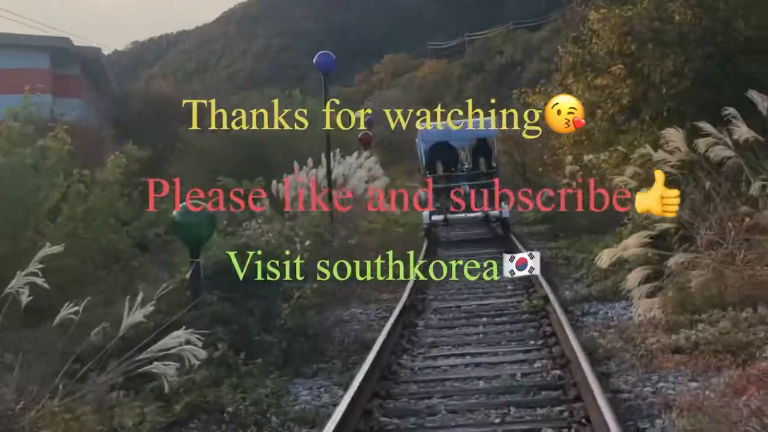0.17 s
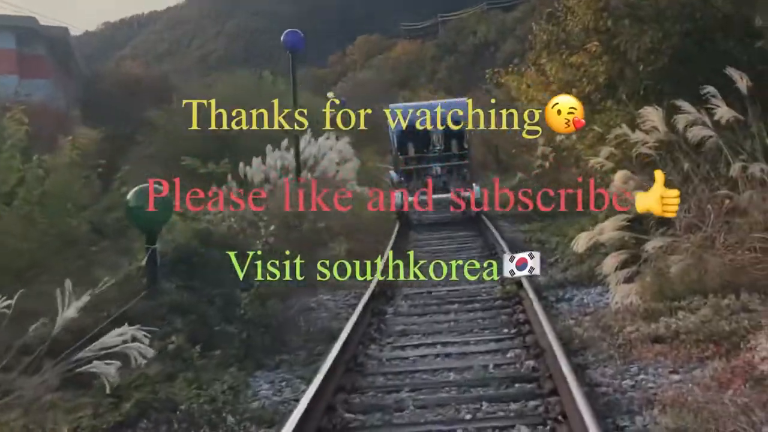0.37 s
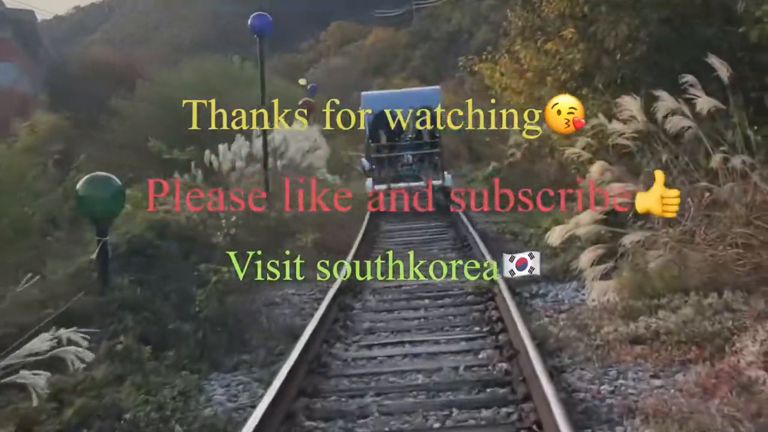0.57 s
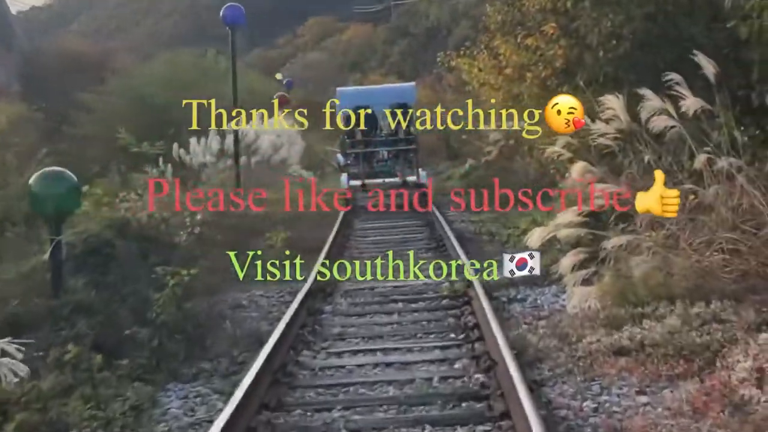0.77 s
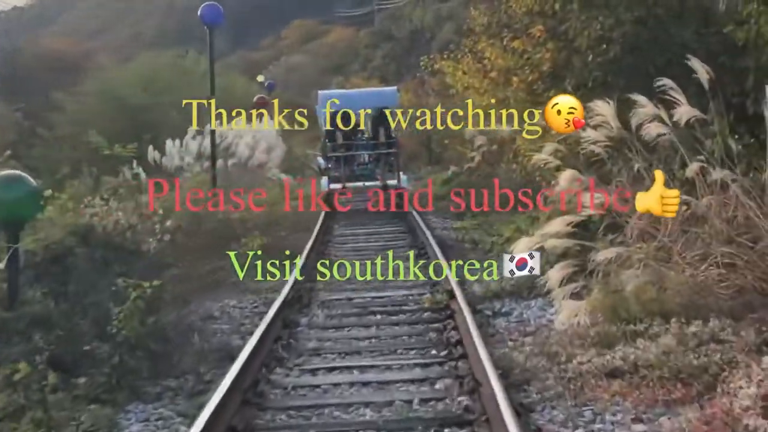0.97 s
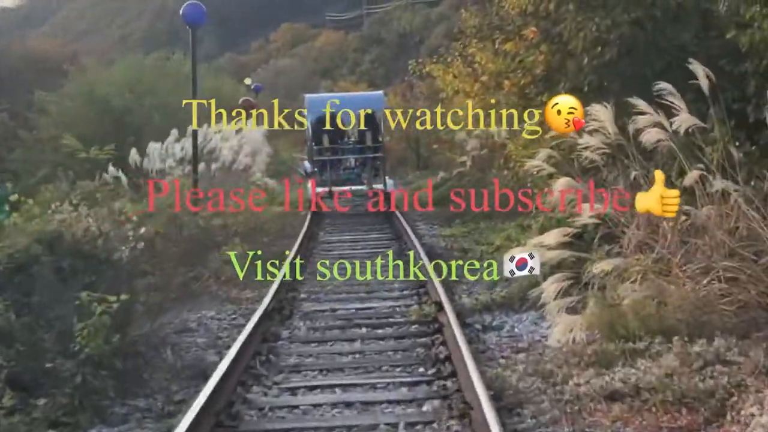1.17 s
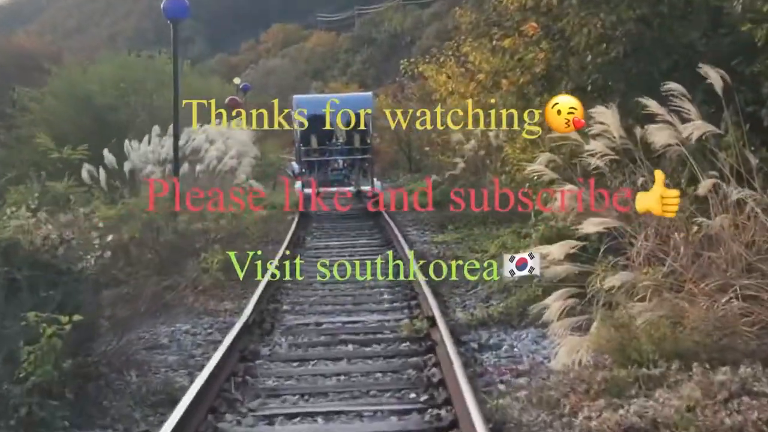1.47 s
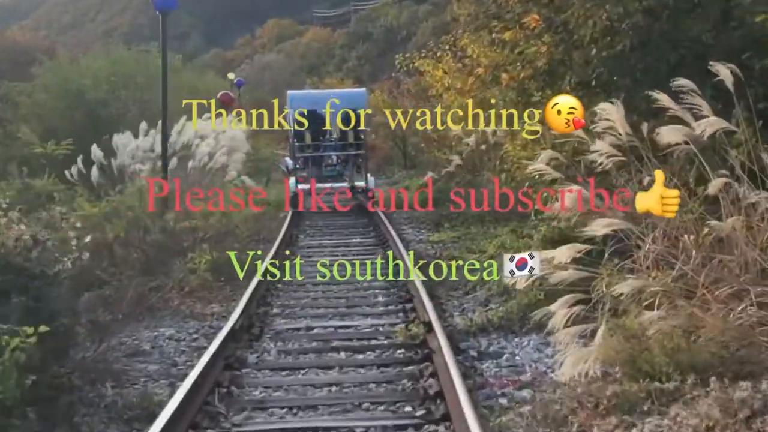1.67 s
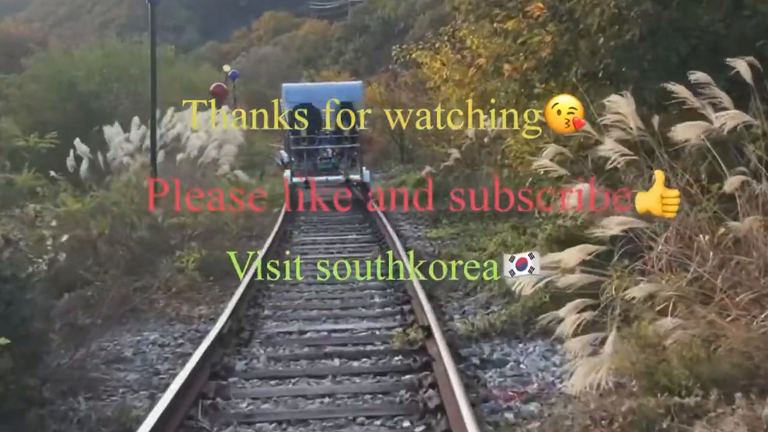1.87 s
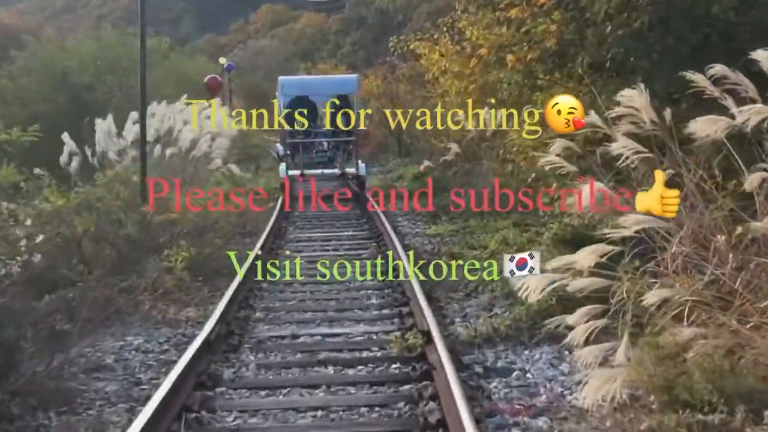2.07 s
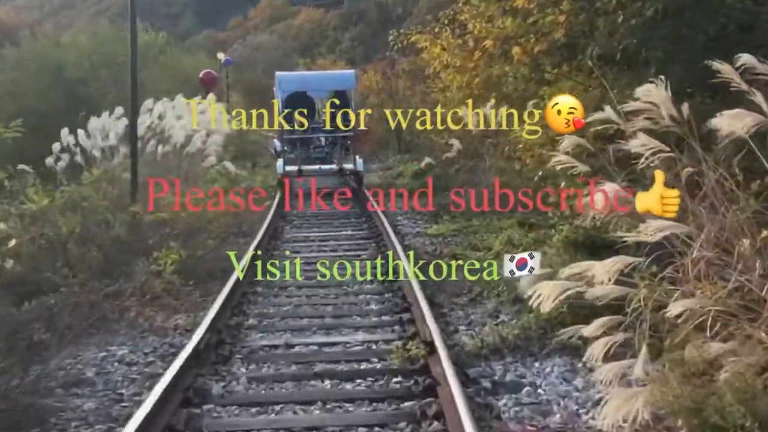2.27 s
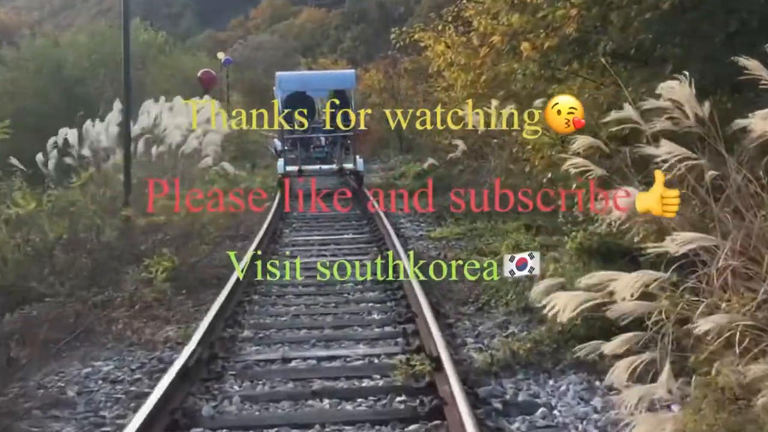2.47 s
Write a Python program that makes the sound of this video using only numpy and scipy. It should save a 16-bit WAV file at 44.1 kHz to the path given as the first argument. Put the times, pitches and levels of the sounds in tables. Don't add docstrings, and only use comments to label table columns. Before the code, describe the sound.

Low lumpy rolling rumble of a small rail cart, with sharp clacks, faint ticks and a brief squeak

```python
import sys
import numpy as np
from scipy import signal
from scipy.fft import rfft, irfft, next_fast_len
from scipy.io import wavfile
from scipy.ndimage import uniform_filter1d, map_coordinates

SR = 44100
rng = np.random.default_rng(int(sys.argv[2]) if len(sys.argv) > 2 else 0)


def int16_out(signal):
    q = np.round(np.clip(np.atleast_2d(signal).T, -1, 1) * 32767)
    wavfile.write(sys.argv[1], SR, q.astype(np.int16))


def magnitude_from_level(level_db):
    exponent = np.asarray(level_db, float) / 20
    return 10 ** exponent


N = 115983
T = np.arange(N) / SR

# f/Hz, density/dB per Hz
LOOSE_METAL = [(600, -16), (2000, 8), (5000, 1), (9000, 1), (15000, -2)]


def unit(x):
    return x / np.sqrt(np.mean(x ** 2) + 1e-20)


def along(points, hz):
    f, v = np.transpose(points)
    return np.interp(np.log(hz + 1), np.log(f + 1), v)


def wobble(rate):
    return map_coordinates(rng.standard_normal(9000), [T * rate])


def evened(x, seconds):
    power = np.abs(uniform_filter1d(x ** 2, int(seconds * SR)))
    return unit(x / np.sqrt(power + 1e-9))


def filtered(x, response):
    m = next_fast_len(N + SR // 2)
    return irfft(rfft(x, m) * response(np.fft.rfftfreq(m, 1 / SR)), m)[:N]


def resonances(modes):
    def response(f):
        total = 0
        for k, (centre, width, db) in enumerate(modes):
            damping = 1j * f * width
            total = total + (-1) ** k * magnitude_from_level(db) * damping / (centre * centre - f * f + damping)
        return total
    return response


def coloured(points):
    return unit(filtered(rng.standard_normal(N), lambda f: magnitude_from_level(along(points, f))))


def wandering(hz, wander_hz, rate):
    return np.sqrt(2) * np.sin(2 * np.pi * np.cumsum(hz + wander_hz * wobble(rate)) / SR)


def strikes(times, levels_db, t60s):
    out, t = np.zeros(N), T[:6000]
    for s, db, t60 in zip(times, levels_db, t60s):
        i = int(s * SR)
        rise = 1 - magnitude_from_level(-60 * t / (0.23 * t60))
        out[i:i + 6000] += (magnitude_from_level(db - 60 * t / t60) * rise)[:max(N - i, 0)]
    return out


def swell(s, length, rise):
    u = np.clip((T - s) / length, 0, 3)
    return (1 - np.exp(-u / rise)) * np.exp(-1.6 * u ** 1.7) * (u < 3)


def bursts(rows, rise):
    out = np.zeros(N)
    for s, n, db, hz in rows:
        u = T - s
        tone = np.sin(2 * np.pi * hz * u * (1 + rise * u / n / 2))
        out += magnitude_from_level(db + 3.5) * np.exp(-(u / n) ** 2) * tone
    return out


def frame_rumble():
    # f/Hz, width/Hz, level/dB
    frame_modes = [(112, 34, -6.5), (250, 83, -7), (166, 59, -13), (329.5, 53, -13.5), (429, 69.6, -6),
                   (511, 46.7, -2.5), (587.4, 36.2, -7), (765, 225, -19.5)]

    def transfer(f):
        band = 1 / np.sqrt((1 + (f / 680) ** 8) * (1 + (88 / (f + 1)) ** 10)) + 0.12
        return resonances(frame_modes)(f) * band

    roughness = rng.standard_normal(N) * magnitude_from_level(0.52 * wobble(24.27))
    return evened(unit(filtered(roughness, transfer)), 0.099)


def floor_panel():
    panel_hz, width_hz = 246, 61
    skin = resonances([(panel_hz, width_hz, 0)])
    shaken = unit(filtered(rng.standard_normal(N), lambda f: skin(f) ** 2))
    return unit(shaken + wandering(panel_hz, 7.54, 13))


def axle(base_db):
    # t/s, length/s, level/dB
    heaves = [(0.213, 0.041, -21), (0.429, 0.041, -30), (0.534, 0.051, -25), (0.654, 0.041, -25),
              (0.728, 0.06, -24), (0.84, 0.028, -31.5), (0.946, 0.029, -26), (1.199, 0.045, -26),
              (1.245, 0.089, -23.5), (1.442, 0.037, -27.5), (1.61, 0.026, -31), (1.7, 0.079, -31),
              (1.77, 0.085, -23.5), (2.123, 0.036, -35), (2.199, 0.022, -31), (2.25, 0.08, -29),
              (2.37, 0.045, -27), (2.5, 0.041, -27), (2.594, 0.029, -33)]
    swells = np.zeros(N)
    for s, n, db in heaves:
        swells += magnitude_from_level(db - 6) * np.exp(-((T - s - n / 2) / (0.56 * n)) ** 4)
    return (magnitude_from_level(base_db - 2 * wobble(6.4)) + swells) * wandering(108.4, 2.93, 12)


def wheel_rims():
    # f/Hz, width/Hz, level/dB
    rim_modes = [(1889, 80, 3), (2008, 47, 2), (2130, 127, 0.5), (2400, 44, -6), (2389, 82, 1),
                 (2596, 9.2, 3), (3230, 95, -16.5), (3507, 64, -6.5), (3768, 75, -6), (4490, 350, -14),
                 (5420, 650, -13.5)]
    rims = np.zeros(N)
    for mode in rim_modes:
        roughness = rng.standard_normal(N) * magnitude_from_level(3 * wobble(45.05))
        rims += filtered(roughness, resonances([mode]))
    return evened(unit(rims), 0.3)


def tread_hiss():
    # f/Hz, density/dB per Hz
    hiss_spectrum = [(18, -115), (30, -25), (103, 33), (231, -22), (333, -13), (506, -0.5), (693, -17),
                     (2030, -29.5), (15600, -47)]
    return unit(filtered(coloured(hiss_spectrum), lambda f: 1 / np.sqrt(1 + (664 / (f + 1)) ** 6)))


def track_bed():
    bed = resonances([(50.5, 70, 0)])
    return unit(filtered(rng.standard_normal(N), lambda f: bed(f) ** 2))


def rolling():
    # t/s, wheel load/dB, floor panel level/dB, axle level/dB
    drive_rows = [(0, -30, -23, -39), (.05, -29.5, -28.5, -35), (.23, -27, -21, -30), (.36, -27, -39, -31),
                  (.5, -27, -22, -24.5), (.7, -27, -26, -30.5), (1.05, -26.5, -24.5, -31.5),
                  (1.29, -25.5, -31, -31), (1.35, -27, -26, -28), (1.48, -26, -33, -28),
                  (1.59, -26.5, -34, -30), (1.66, -25.5, -25, -22), (1.78, -25.5, -28, -22.5),
                  (1.97, -25, -27.5, -34), (2.28, -26, -63, -22), (2.45, -25.5, -23, -28),
                  (2.56, -26, -26, -31), (2.63, -29.5, -35, -23)]
    s, *drives = np.transpose(drive_rows)
    load_db, panel_db, axle_db = (np.interp(T, s, d) for d in drives)
    body = magnitude_from_level(load_db + 1.92) * frame_rumble() + magnitude_from_level(panel_db - 6.5) * floor_panel() + axle(axle_db - 6.5)
    shake = magnitude_from_level(0.67 * (load_db - load_db.mean()) + 0.37 * wobble(9.08))
    wheels = shake * (magnitude_from_level(-42) * wheel_rims() + magnitude_from_level(-38.5) * tread_hiss())
    return body + wheels + magnitude_from_level(-52) * track_bed()


def rattles():
    per_s, floor_db, spread_db, t60 = 60, -52, 2.5, 0.029
    gaps, sizes, lengths = rng.exponential(size=(300, 3)).T
    times = np.cumsum(gaps) / per_s
    levels_db = floor_db + spread_db * np.minimum(sizes, 2.5)
    return strikes(times, levels_db, t60 * (.5 + lengths)) * coloured(LOOSE_METAL)


def clacks():
    # t/s, peak level/dB, knock peak level/dB, t60/s
    clack_rows = [(.0135, -35, -53, 0.046), (.034, -35, -36, 0.026), (0.0397, -23.5, -28.5, 0.017),
                  (0.048, -41, -37, .03), (0.194, -30, -48, 0.011), (0.246, -38, -37, 0.028),
                  (.733, -43, -44, 0.056), (0.793, -37, -39, 0.043), (0.956, -37, -44, .04),
                  (1.077, -36, -38, .035), (1.084, -48, -40, .035), (1.093, -46, -32.5, .035),
                  (1.241, -47, -60, 0.044), (1.305, -42, -36.5, .035), (1.392, -44, -41, .035),
                  (1.654, -40, -36, .035), (1.723, -24, -28.5, 0.036), (1.737, -39, -41, .035),
                  (1.934, -56, -40, .035), (2.0235, -39, -81, 0.062), (2.259, -32.5, -63, 0.046),
                  (2.276, -35, -54, 0.038), (2.3908, -30, -44, 0.036), (2.481, -38, -42, .04),
                  (2.499, -40, -55, .03), (2.553, -46, -31, .03)]
    # t/s, peak level/dB
    small_ticks = [(0.1087, -46), (0.1394, -52), (0.3017, -44), (0.3446, -43), (0.415, -53), (0.4594, -39),
                   (0.555, -36.5), (0.7791, -38), (0.8629, -42), (1.4696, -40), (1.8766, -38),
                   (1.9904, -42), (2.073, -36), (2.147, -34), (2.3114, -39)]
    # f/Hz, width/Hz, level/dB
    knock_modes = [(1125, 110, 4), (1364, 160, 4.5), (1700, 190, 2.5), (2590, 490, 0), (3570, 180, 2.5),
                   (4450, 720, -2.5)]
    # f/Hz, level/dB, t60/s
    hollow_modes = [(1137, 4, 0.031), (1400, 1.5, 0.036)]
    s, db, knock_db, t60 = np.transpose(clack_rows)
    small_s, small_db = np.transpose(small_ticks)
    tick_envelope = strikes(s, db - 3.5, t60) + strikes(small_s, small_db - 2, 0 * small_s + 0.032)
    ticks = tick_envelope * coloured(LOOSE_METAL)

    def dying(level_db, decay_s):
        lag_s, rise_s = .0003, .0005
        slow = strikes(s + lag_s, level_db, 0 * s + decay_s)
        return slow - strikes(s + lag_s, level_db, 0 * s + 7 * rise_s)

    blows = rng.standard_normal(N)
    body = resonances(knock_modes)
    knocks = filtered(dying(knock_db + 2.5, .038) * blows, body) / np.std(filtered(blows, body))
    rings = sum(dying(knock_db - 0.5 + g, d) * wandering(hz, 39.0, 90) for hz, g, d in hollow_modes)
    return ticks + knocks + rings


def squeaks():
    # t/s, f/Hz
    squeak_starts = [(2.523, 4680), (2.52, 5050), (.248, 5150), (2.036, 11750), (2.053, 9450), (.92, 8950),
                     (1.295, 10750), (.048, 9350)]
    # length/s, level/dB, overtone level/dB
    squeak_sizes = [(.02, -33, -1), (.009, -33, -5), (.024, -42, -12), (.018, -44, -30), (.01, -50, -30),
                    (.018, -50, -30), (.014, -51, -30), (.012, -48, -30)]
    sag, jitter, flutter_db = .002, .024, 1.8
    out = np.zeros(N)
    for (s, hz), (n, db, over_db) in zip(squeak_starts, squeak_sizes):
        pitch = 1 - sag * np.clip((T - s) / n - .5, -1, 2) + jitter * wobble(1400)
        turn = 2 * np.pi * np.cumsum(hz * pitch) / SR
        over = magnitude_from_level(over_db) * (np.sin(2 * turn) + magnitude_from_level(-10) * np.sin(3 * turn)) * (hz < 6000)
        level = magnitude_from_level(db + 6.0 + flutter_db * wobble(400))
        out += level * swell(s, n, 0.072) * (np.sin(turn) + over)
    return out


def rim_squeals():
    # t/s, f/Hz
    squeal_rows = [(.262, 2450), (.302, 1950), (.52, 2420), (.555, 2380), (.762, 1970), (.812, 2000),
                   (.897, 2060), (1.098, 2480), (1.23, 2430), (1.28, 2020), (1.52, 1900), (1.95, 1900),
                   (2.015, 1920), (2.22, 2420), (2.25, 1960), (2.34, 2450), (2.4, 2420), (2.465, 2440),
                   (2.51, 1900)]
    half_length_s, level_db = 0.0056, -41
    sizes_db = 0.4 * rng.standard_normal(40)
    rows = [(s, half_length_s, level_db + d, hz) for (s, hz), d in zip(squeal_rows, sizes_db)]
    return bursts(rows, 0.018) * magnitude_from_level(2.6 * wobble(200))


def booms():
    # t/s, length/s, level/dB, f/Hz
    panel_surges = [(.393, .04, -23.5, 242), (.5, .025, -23, 227), (.535, 0.049, -19, 244),
                    (.63, .045, -21.5, 246), (.774, .036, -27, 240), (.889, .036, -24, 236),
                    (.97, .042, -27.5, 244), (1.113, .032, -21.5, 250), (1.157, .034, -22, 227),
                    (1.195, .03, -25.5, 238), (1.291, 0.025, -27.5, 240), (1.535, .04, -22.5, 237),
                    (1.625, 0.036, -17.5, 247), (1.668, .04, -17.5, 245), (1.732, .034, -19, 256),
                    (1.777, 0.048, -18, 238.7), (1.835, 0.0454, -22.5, 250), (1.893, .04, -20.5, 239),
                    (1.945, 0.058, -25, 238), (2.056, .038, -26.5, 236), (2.145, .036, -22, 224),
                    (2.36, 0.059, -22, 233), (2.428, .03, -27, 249), (2.47, .036, -24, 250),
                    (2.535, .04, -21, 250)]
    # t/s, length/s, level/dB, f/Hz
    frame_jolts = [(0.501, 0.038, -22, 491), (0.756, 0.056, -25.5, 537), (0.866, 0.04, -20, 465),
                   (0.908, 0.04, -24, 490), (1.205, 0.048, -22, 496), (1.293, 0.034, -16, 493),
                   (1.481, 0.052, -23.5, 502), (1.582, 0.04, -20, 489), (1.616, 0.068, -19, 493.3),
                   (2.043, 0.038, -28, 473), (2.157, 0.06, -23, 500), (2.45, 0.052, -25.5, 532)]

    def boom(rows, gain_db):
        return bursts([(s + n / 2, 0.43 * n, db + gain_db, hz) for s, n, db, hz in rows], 0)

    return boom(panel_surges, -0.5) + boom(frame_jolts, -3.5) * magnitude_from_level(2.4 * wobble(130))


def scrapes():
    stroke_starts = [.865, 1.076, 1.385, 1.635, 1.745, 2.44, 2.55]
    # length/s, level/dB
    stroke_sizes = [(0.057, -43.5), (0.037, -42), (0.052, -42), (0.034, -36.5), (0.034, -38.5), (0.19, -42),
                    (0.069, -41)]
    # f/Hz, density/dB per Hz
    scrape_spectrum = [(700, -16), (1500, 10), (5000, 3), (9000, -1.5), (15000, -8)]
    strokes = sum(magnitude_from_level(db) * swell(s, n, 0.16) for s, (n, db) in zip(stroke_starts, stroke_sizes))
    grain = magnitude_from_level(1.4 * wobble(250))
    return strokes * grain * coloured(scrape_spectrum)


def joint_thump():
    # f/Hz, level/dB, t60/s
    thump_tones = [(500, -12, .045), (230, -12, .05), (110, -19, .1)]
    u = np.maximum(T - 1.3005, 0)
    thump = sum(magnitude_from_level(level - 60 * u / d) * np.sin(2 * np.pi * hz * u) for hz, level, d in thump_tones)
    return thump * (1 - np.exp(-u / 0.0015))


def scene():
    steady = rolling() + rattles()
    events = clacks() + squeaks() + rim_squeals() + booms() + scrapes() + joint_thump()
    return (steady + events)[None]


def top_cut(x):
    return signal.sosfilt(signal.butter(12, 15760, fs=SR, output="sos"), x)


def record(dry):
    mix = filtered(dry[0], lambda f: f < 15740)[None]
    return top_cut(mix)


dry = scene()
out = record(dry)
int16_out(out)
```